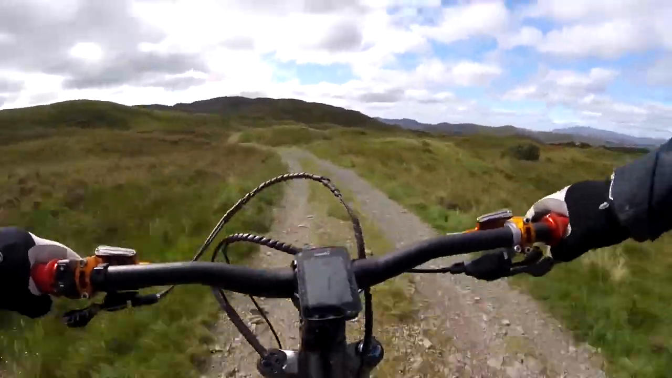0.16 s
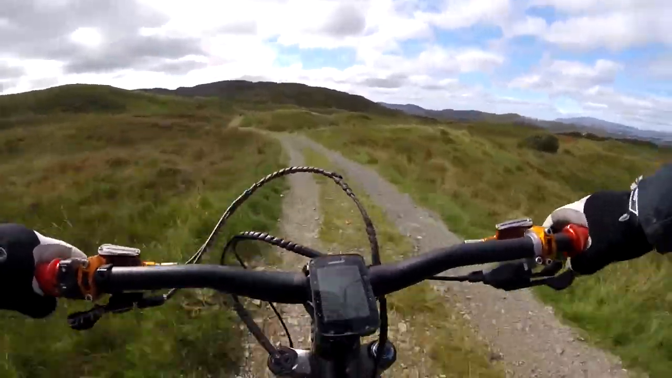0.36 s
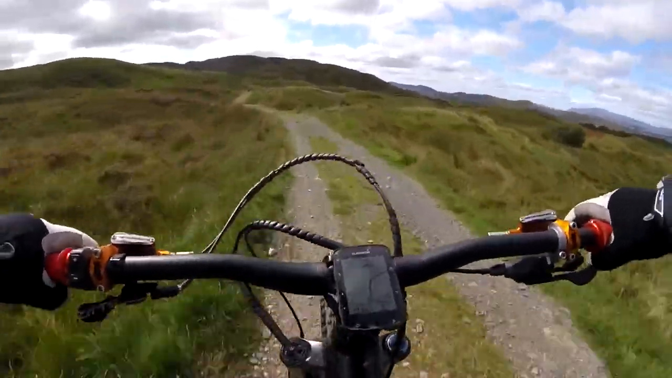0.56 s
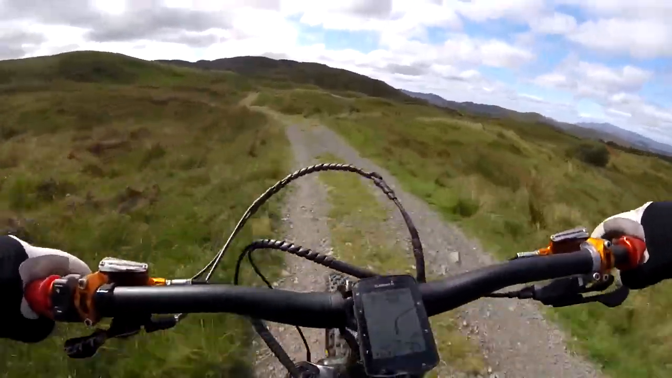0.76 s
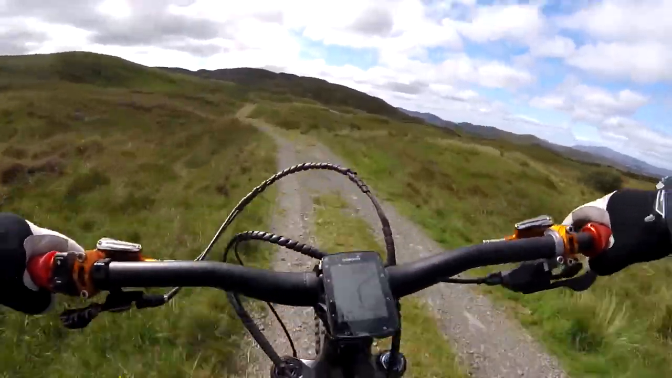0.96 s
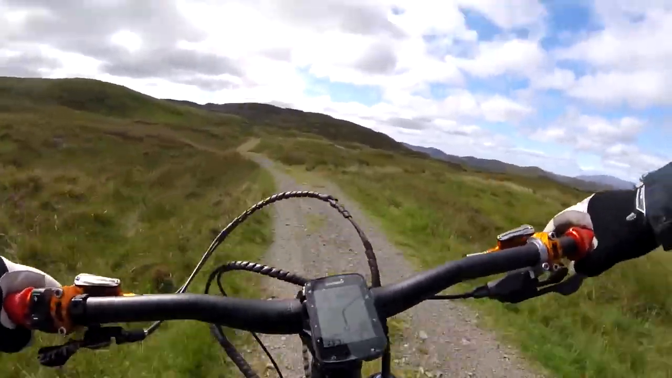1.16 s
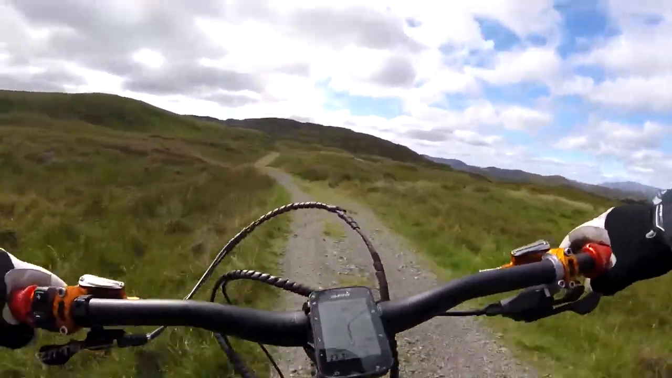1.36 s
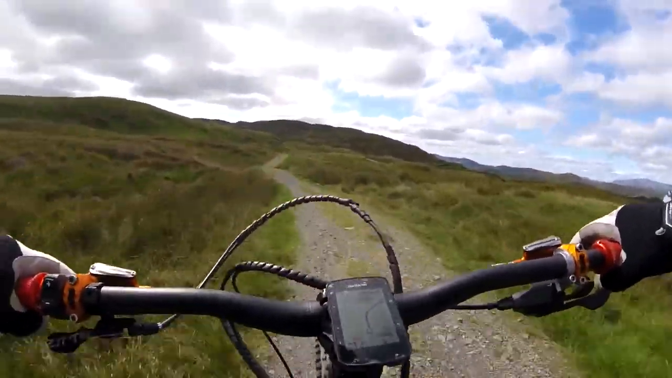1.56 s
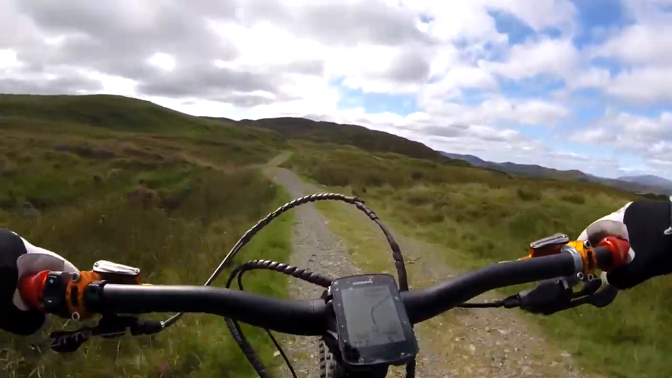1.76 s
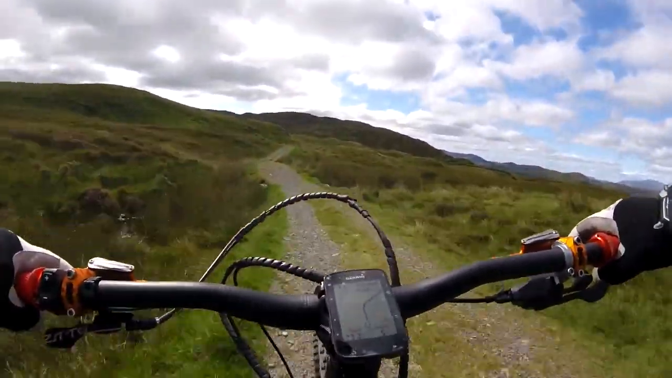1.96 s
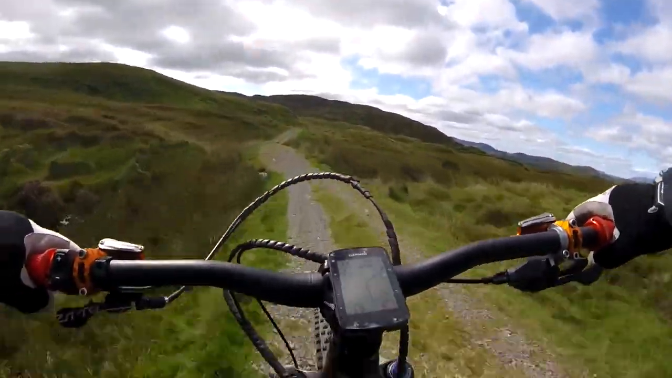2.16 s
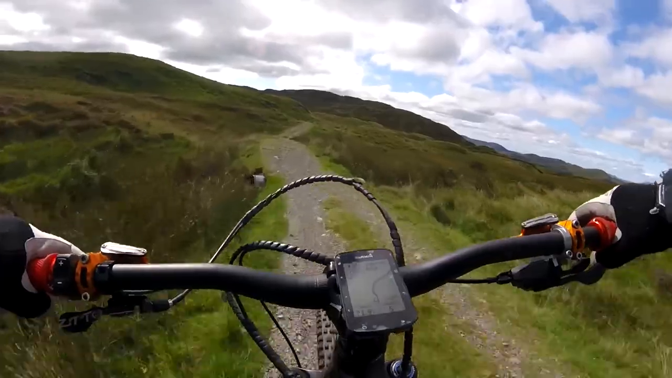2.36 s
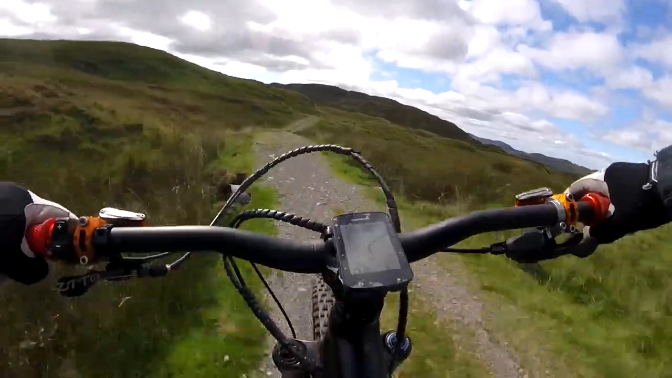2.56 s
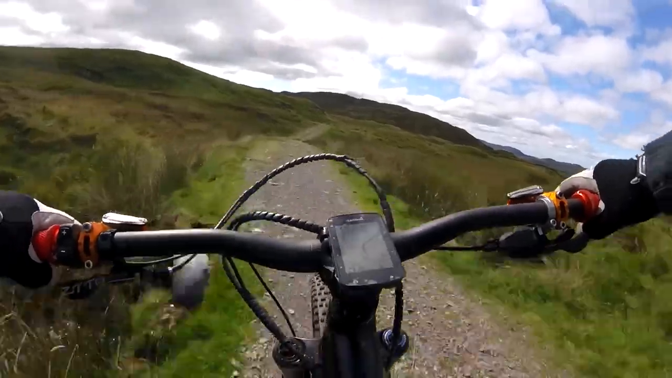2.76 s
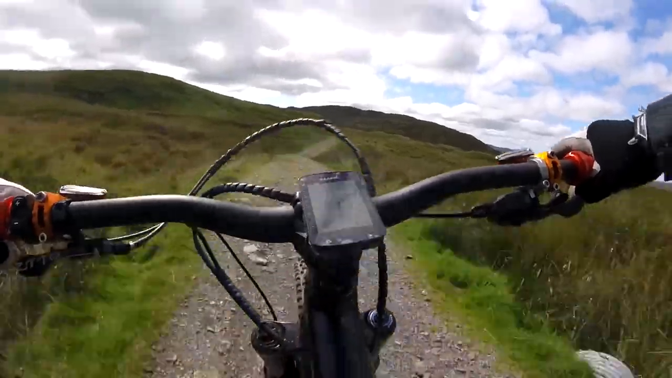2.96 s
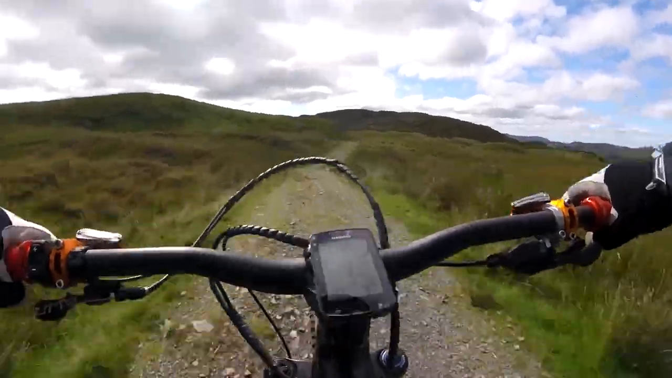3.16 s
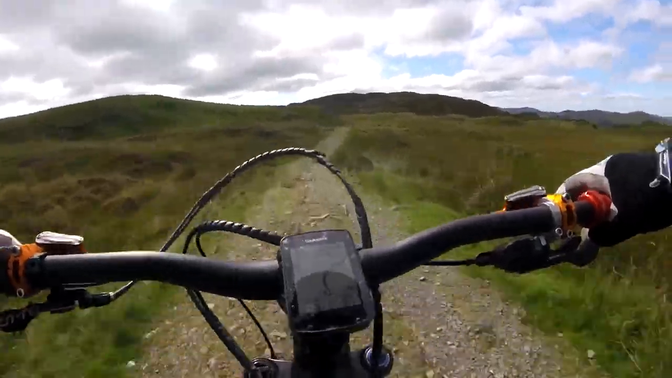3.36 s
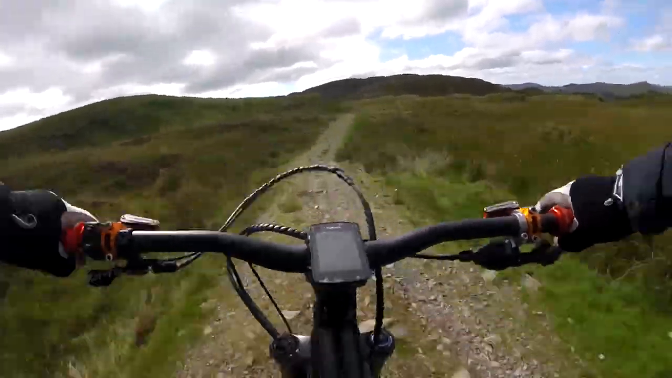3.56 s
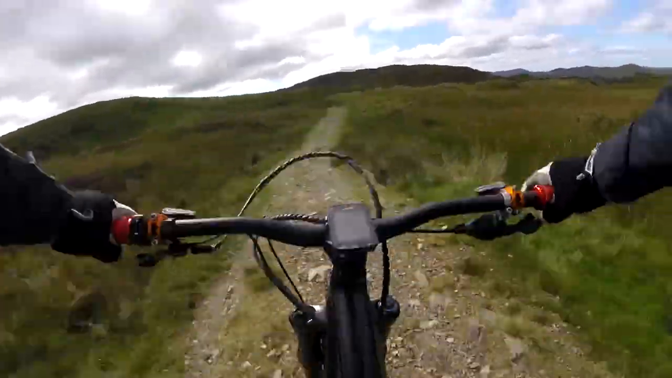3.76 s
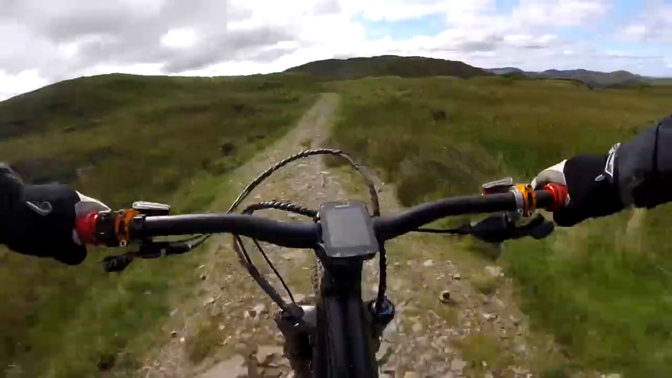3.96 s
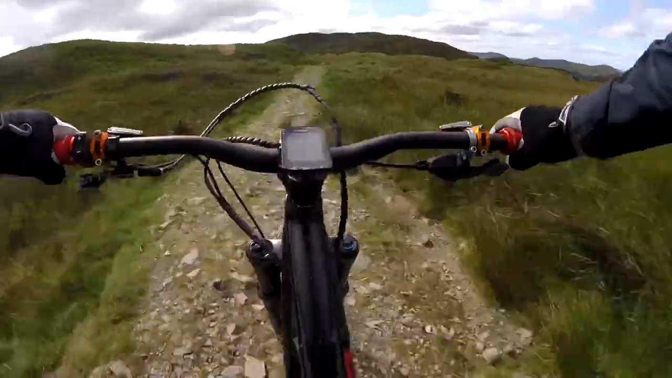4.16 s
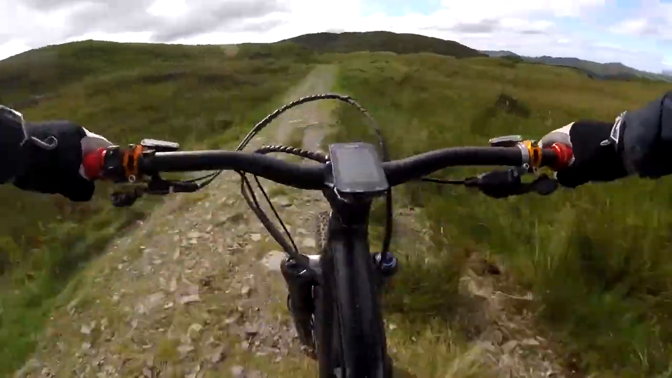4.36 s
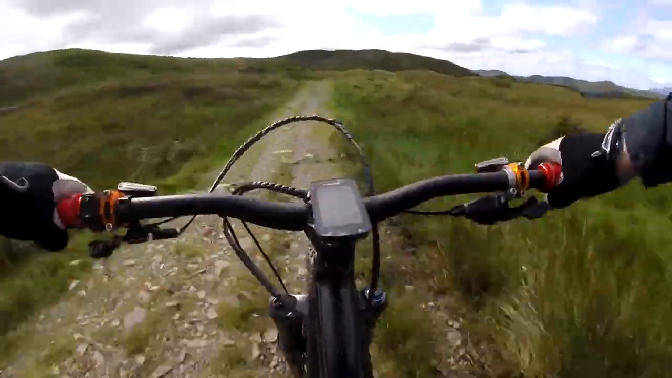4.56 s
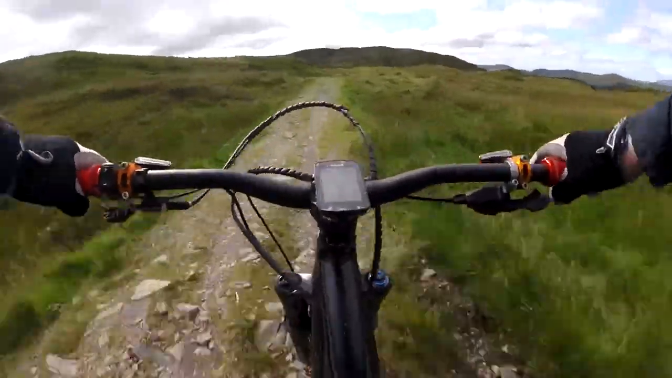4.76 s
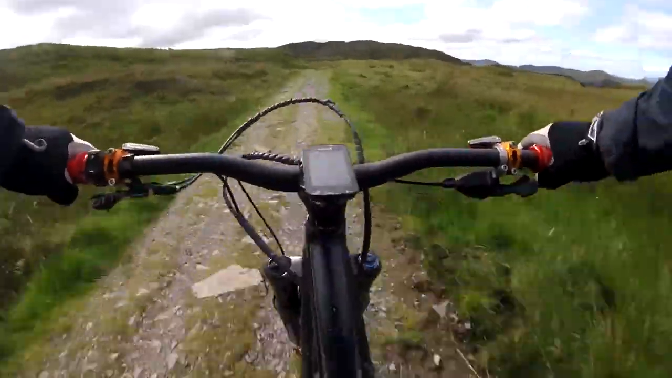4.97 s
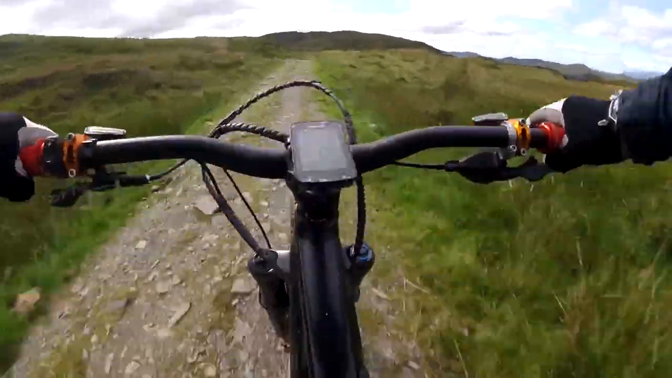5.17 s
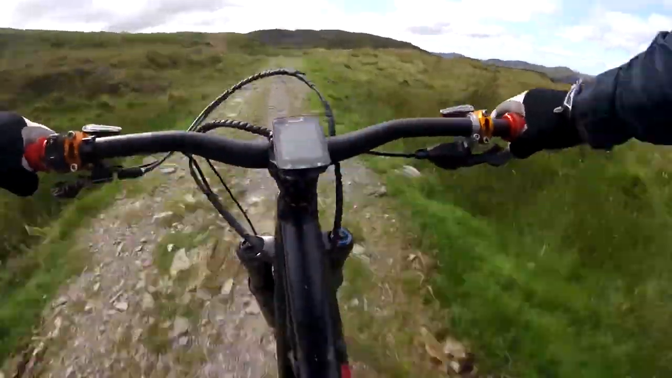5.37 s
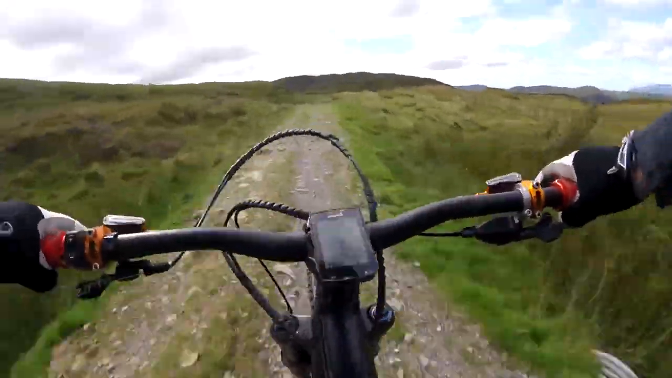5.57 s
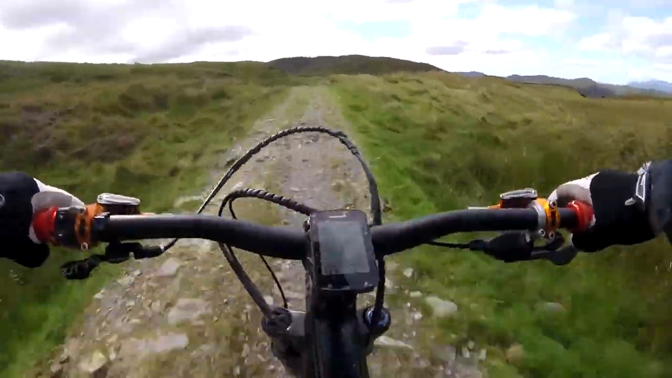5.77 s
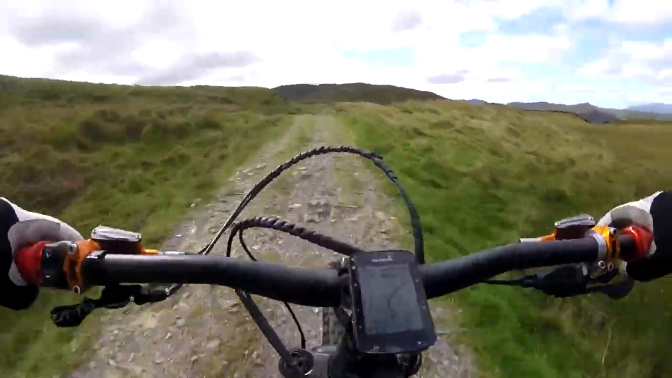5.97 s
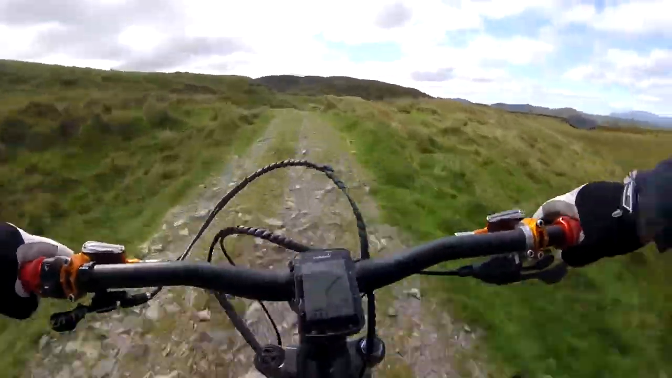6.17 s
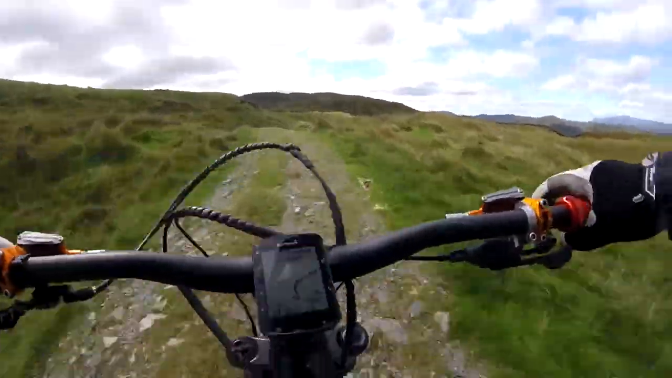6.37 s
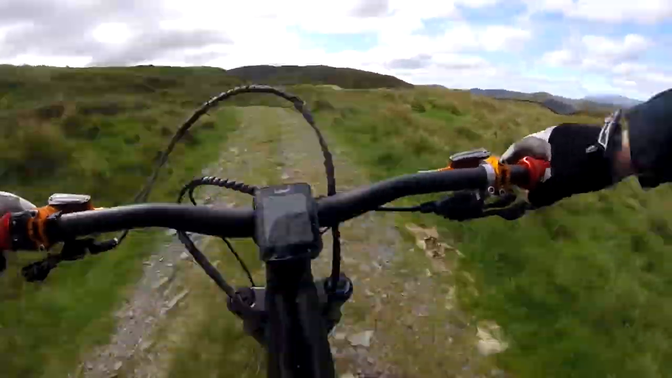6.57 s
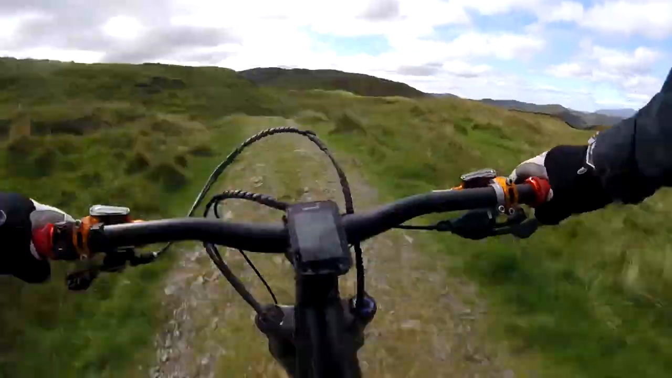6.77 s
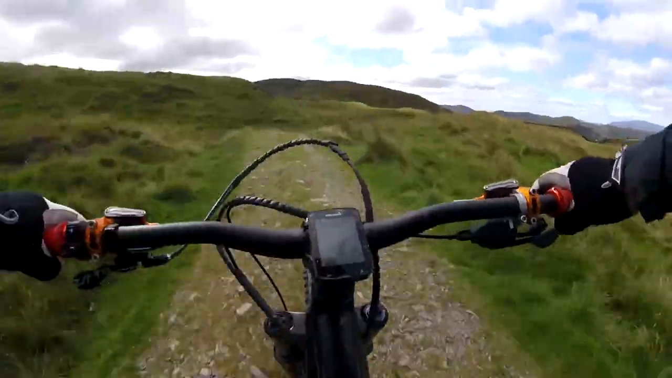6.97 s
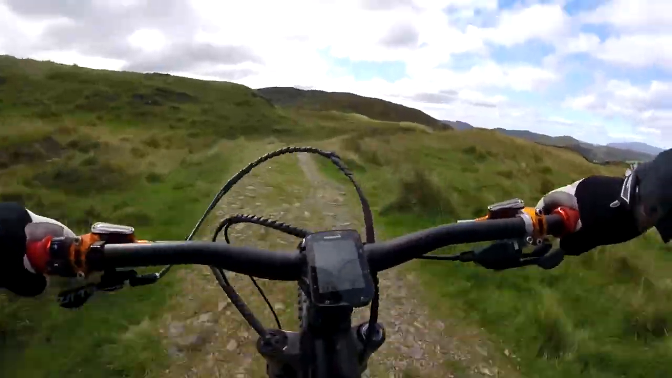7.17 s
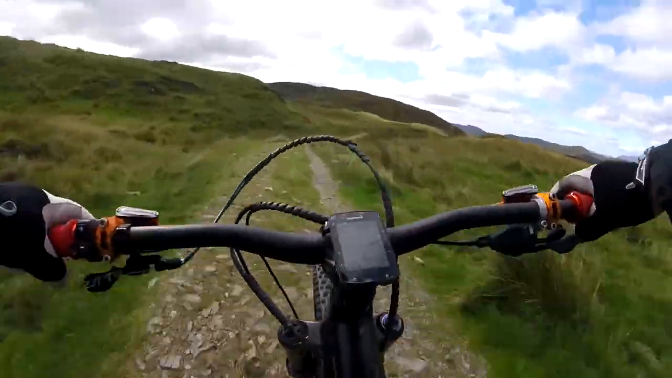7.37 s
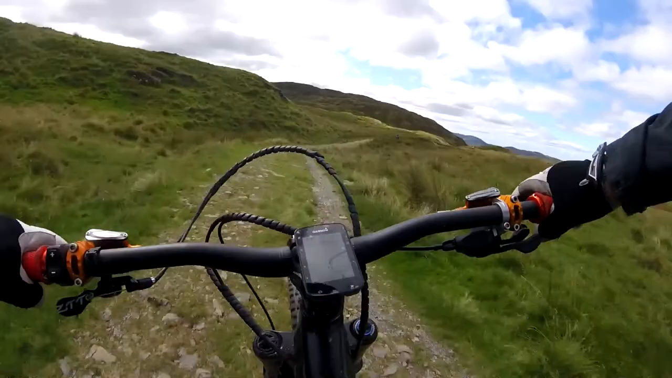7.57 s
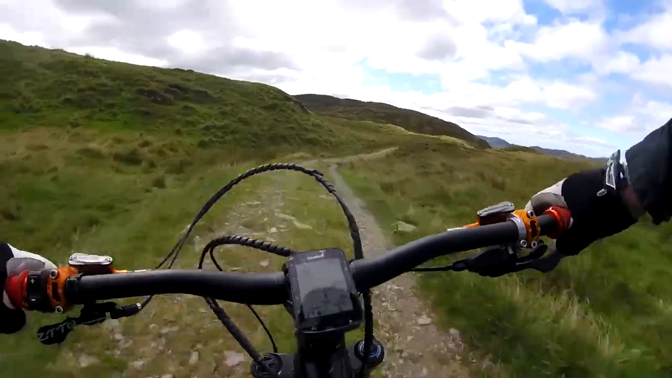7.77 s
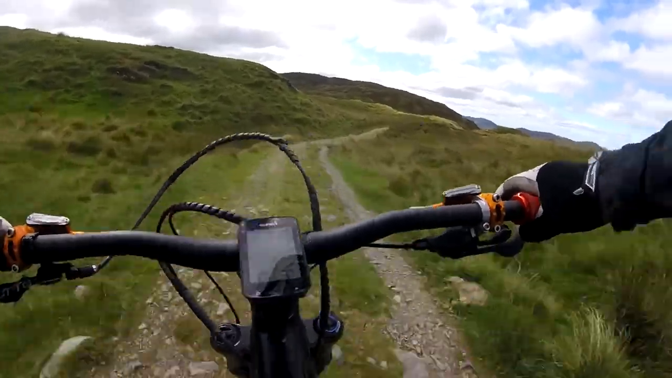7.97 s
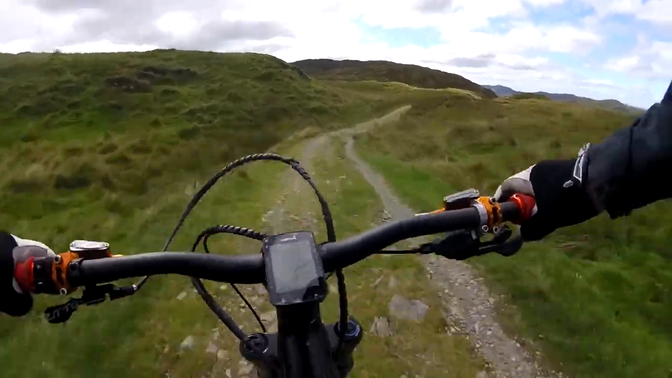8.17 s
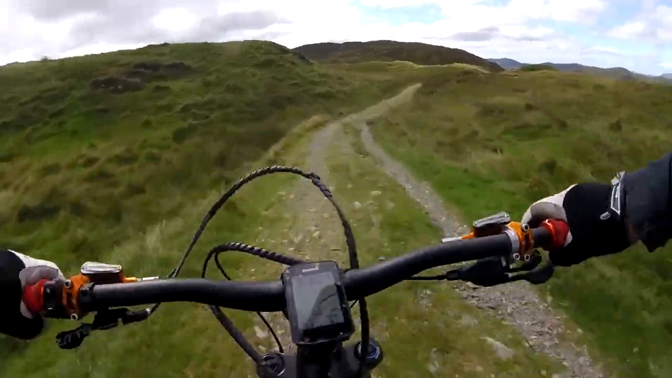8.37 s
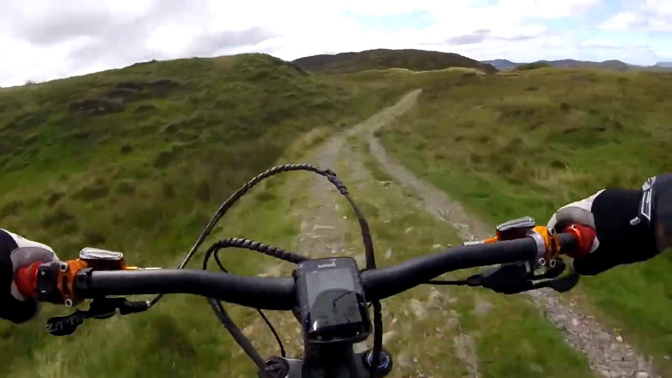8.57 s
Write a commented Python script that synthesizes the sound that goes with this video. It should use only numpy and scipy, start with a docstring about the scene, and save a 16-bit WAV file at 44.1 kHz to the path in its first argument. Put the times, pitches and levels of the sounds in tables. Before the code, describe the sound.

Tyres crunch steadily over gravel, dense and granular, with tiny bright ticks and pings as stones hit the bike. Gusts rumble and flutter on the microphone, with slaps and padded case knocks in two strong rough passages. Afterwards it calms to coarser crunching, scrapes and clacking pebbles. Dry open-air mono sound, very close, with no echo.

```python
"""On a loose stony track a mountain bike rolls fast downhill, heard from a camera on the rider's chest.
The tyres crunch gravel and spray grit: clustered random clicks through coloured filters and pitched rings.
Single stones clack, scrape or ping off the bike; bumps knock the camera case with a thud and a rattle.
Gusts buffet the microphone as filtered noise, with popping flutter and hard jolts.
Low decaying slaps and thumps come from wind and rough ground."""
import sys
import numpy as np
from scipy import signal
from scipy.fft import rfft, irfft
from scipy.io import wavfile
from scipy.ndimage import uniform_filter1d

SR = 44100
rng = np.random.default_rng(int(sys.argv[2]) if len(sys.argv) > 2 else 0)


def store_pcm(level_fs):
    """Save levels as 16-bit WAV."""
    pcm = np.round(np.clip(level_fs, -1, 1) * 32767).astype(np.int16)
    wavfile.write(sys.argv[1], SR, np.atleast_2d(pcm).T)


N = 380136
T = np.arange(N) / SR  # time in s
EVENT_SAMPLES = 4096  # room for one short sound, about 93 ms

# All colours are spectral outlines: pitch_hz [Hz], relative level_db [dB per Hz].
# Sharp snap of stone on stone: pitch_hz [Hz], level_db [dB per Hz]
SNAP_COLOUR = [(700, 0.5), (1500, -5), (1900, -3.5), (2200, -2), (2700, -8), (3300, -10.5), (3900, -13.5),
               (4400, -17.5), (4900, -13), (6000, -9), (10000, -29.5)]
# Bright tick of small hard stones: pitch_hz [Hz], level_db [dB per Hz]
PING_COLOUR = [(1000, -17), (3000, -4.5), (4200, -25), (5200, -9), (5700, 8), (6100, -6), (6600, 6.5),
               (7100, -8), (8000, -1.5), (9000, -6), (11000, -14.5), (14000, -75)]


def undb(db):
    """Decibels to gain."""
    return np.exp(np.asarray(db) * np.log(10) / 20)


def unit(x):
    """Scale to rms 1."""
    return x / np.sqrt(np.mean(x ** 2))


def curve(table):
    """A (time, level) table joined by straight lines in time."""
    start_s, level_db = np.transpose(table)
    return np.interp(T, start_s, level_db)


def colour(x, points, size=8192):
    """Causal minimum-phase filter with the given (Hz, dB) outline: its peaks ring after each click."""
    hz, db = np.transpose(points)
    bins_hz = np.maximum(np.arange(size // 2 + 1) * SR / size, 1)
    outline_db = np.interp(np.log(bins_hz), np.log(hz), db)
    # folding the cepstrum forward in time makes the filter causal
    cepstrum = irfft(np.log(undb(outline_db)))
    cepstrum[1:size // 2] *= 2
    cepstrum[size // 2 + 1:] = 0
    response = irfft(np.exp(rfft(cepstrum)))
    return signal.fftconvolve(x, response)[:len(x)]


def walk(rate_hz):
    """Random levels, rate_hz new ones a second, joined by straight glides; rms 1."""
    hold = max(int(SR / rate_hz), 2)
    steps = rng.standard_normal(N // hold + 1)
    return unit(uniform_filter1d(np.repeat(steps, hold), hold)[:N])


def grains(rate_hz, spread_db):
    """Contacts at random moments, rate_hz a second on average, most small and a few large."""
    happens = rng.random(N) < rate_hz / SR
    size, sign = rng.standard_normal((2, happens.sum()))
    out = np.zeros(N)
    out[happens] = undb(spread_db * np.minimum(size, 2)) * np.sign(sign)
    return out


def add(out, start_s, sound, level_db):
    """Mix in a sound whose loudest 4 ms have the given rms level."""
    i = max(int(start_s * SR), 0)
    peak = np.sqrt(uniform_filter1d(sound ** 2, 176).max())
    out[i:i + len(sound)] += (sound * undb(level_db) / peak)[:N - i]


def burst(decay_s):
    """A contact: noise that dies away at once."""
    return rng.standard_normal(EVENT_SAMPLES) * np.exp(-T[:EVENT_SAMPLES] / decay_s)


def ring(x, hz, width_hz):
    """One resonance, gain 1 at its centre."""
    b, a = signal.iirpeak(hz, max(hz / width_hz, .5), fs=SR)
    return signal.lfilter(b, a, x)


def airflow():
    """Buffeting level in dB before trims: the powers of the uneven riding breeze and of the gusts add up."""
    # steady air stream of riding: start_s [s], level_db [dB before trims]
    breeze = [(0.0, -27), (0.7, -33), (1.4, -30.5), (2.1, -29.5), (3.2, -33), (3.8, -28), (4.6, -23),
              (5.55, -29), (6.0, -32.5), (7.15, -32.5), (8.0, -30), (8.62, -31.5)]
    # gusts on the microphone: full_s [s, when the swell is complete], hold_s [s], level_db [dB before trims]
    gusts = [(0.454, .07, -31), (0.802, 0.028, -26.5), (1.613, 0.13, -30), (2.187, 0.83, -25),
             (2.367, 0.048, -21), (2.558, 0.24, -16.5), (3.918, 0.091, -21), (4.078, 0.12, -13.5),
             (4.366, 0.23, -16.5), (4.635, 0.15, -21), (4.894, 0.55, -21), (5.079, 0.12, -14.5),
             (5.336, 0.16, -17), (5.94, 0.75, -31), (6.543, 0.1, -26.5), (6.76, 0.065, -26.5),
             (7.38, 0.083, -37), (7.993, 0.071, -28.5), (8.38, 0.14, -29)]
    attack_s, release_s = 0.036, 0.027
    wobble_db = 2  # rms
    power = undb(curve(breeze) + wobble_db * walk(12)) ** 2
    for full_s, hold_s, level_db in gusts:
        swell = np.clip(1 + (T - full_s) / attack_s, 0, 1)
        fade = np.exp(-np.maximum(T - full_s - hold_s, 0) / release_s)
        power = power + (undb(level_db) * swell * fade) ** 2
    return 10 * np.log10(power)


def wind():
    """Large eddies rumble, small ones pop and strong gusts jolt; low slaps and thumps decay on top."""
    # rumble of large eddies: pitch_hz [Hz], level_db [dB per Hz]
    rumble_colour = [(12, -10), (25, -0.5), (50, -0.5), (80, -1), (125, -6), (165, -8), (230, -10.5),
                     (320, -17.5), (450, -27.5), (650, -34), (1200, -51.5), (3000, -73), (12000, -87)]
    # pops of small eddies: pitch_hz [Hz], level_db [dB per Hz]
    flutter_colour = [(70, -15), (125, 10.5), (165, -4), (205, 9.5), (260, 1), (350, 2.5), (500, -8.5),
                      (680, -16.5), (900, -11.5), (1500, -21.5), (3000, -32.5), (12000, -66)]
    # sharp edge of an eddy bursting on the case: pitch_hz [Hz], level_db [dB per Hz]
    jolt_colour = [(100, -13), (250, -4.5), (420, 1), (700, -4), (1000, -10.5), (1500, -22), (3000, -52),
                   (12000, -74)]
    # low decaying slaps and thumps, of wind and of rough ground:
    # start_s [s], level_db [dB before trim], pitch_hz [Hz]
    slaps = [(0.853, -18, 50.3), (2.381, -6, 37.3), (2.651, -9, 129), (2.701, -2.5, 72.5), (2.79, -10, 82),
             (2.99, -1, 113), (3.918, -15, 197), (4.085, -7, 230), (4.151, -8, 132), (4.193, -6, 116),
             (4.465, -10, 135), (4.565, 0.5, 86), (5.084, -3, 56), (5.35, -2.5, 107), (5.405, -7, 76),
             (5.479, -8, 126), (6.172, -15, 117), (6.348, -17, 214), (6.755, -16, 90), (6.773, -15.5, 192),
             (7.384, -15, 44.7), (7.469, -17.5, 54.6), (7.852, -16.5, 44), (7.998, -14, 122),
             (8.024, -12, 137), (8.357, -17, 66.7), (8.404, -20, 170)]
    slap_trim_db = -3.0

    flow_db = airflow()
    eddies = unit(colour(rng.standard_normal(N) * undb(2.15 * walk(70)), rumble_colour))
    # the flow sets the strength of the eddies over any few of them (68 ms)
    eddies = eddies / np.sqrt(uniform_filter1d(eddies ** 2, size=3000))
    flutter = unit(colour(grains(800, 4.8) * np.abs(eddies) ** 1.08, flutter_colour))
    jolts = unit(colour(grains(1800, 1.3) * np.maximum(eddies, 0), jolt_colour))

    out = eddies * undb(flow_db + 0.5)
    out += flutter * undb(0.97 * (flow_db + 19.0) - 28.5)
    # jolts grow faster than the flow
    out += jolts * undb(1.33 * (flow_db + 14) - 33.0)
    t = T[:EVENT_SAMPLES]
    for start_s, level_db, hz in slaps:
        # each slap decays within about one cycle
        slap = np.sin(2 * np.pi * hz * t) * np.exp(-t * hz / 0.9)
        add(out, start_s, slap * rng.choice([-1, 1]), level_db + slap_trim_db)
    return out


def knocks():
    """A bump jolts the camera case: a padded tap and a damped thud together, with a brief mount rattle."""
    # bumps: start_s [s], tap_db [dB before trim], thud_db [dB before trim], pitch_hz [Hz], rattle_s [decay, s]
    bumps = [(0.314, -29, -23.5, 596, .003), (0.3171, -17.5, -25.5, 1380, 0.0074),
             (0.657, -33, -19.5, 650, 0.0018), (1.028, -40, -27, 600, .003),
             (1.796, -23.5, -27, 900, 0.0025), (1.807, -20.5, -18.5, 1240, 0.0025),
             (2.033, -36, -21.5, 600, .003), (2.197, -24, -22, 850, 0.0033), (2.405, -22, -24, 880, 0.0045),
             (2.552, -32, -15, 600, .003), (2.5651, -16.5, -14, 1150, 0.0026),
             (2.5933, -16, -14, 694, .004), (2.716, -24, -15, 620, .004), (2.972, -26, -37, 800, .003),
             (2.9877, -14.5, -18, 1160, 0.0017), (2.997, -21, -28, 740, 0.004),
             (3.016, -28, -28, 800, .003), (3.3113, -15.5, -22, 940, 0.0022),
             (3.548, -30, -26.5, 700, 0.0047), (3.9418, -13, -24, 1400, 0.0017),
             (4.067, -21, -18, 950, 0.0043), (4.094, -21, -13, 1300, .003),
             (4.132, -22, -15.5, 600, 0.0035), (4.184, -32, -16.5, 620, .003),
             (4.244, -30, -19, 1200, .003), (4.3501, -13, -12, 780, 0.0038), (4.4729, -25, -16, 950, .003),
             (4.552, -25.5, -23, 700, 0.0035), (4.591, -22, -16, 1150, .004),
             (4.698, -31, -17.5, 620, .003), (4.942, -31, -16.5, 620, .003), (5.017, -30, -15.5, 650, .003),
             (5.125, -23, -16, 650, 0.0028), (5.186, -24, -12, 700, 0.0048),
             (5.236, -21.5, -33, 1490, .004), (5.407, -28, -12.5, 650, .003),
             (5.778, -26, -42, 960, 0.0036), (6.0, -27, -39, 790, .004), (6.608, -43, -20.5, 600, .003),
             (6.754, -44, -23.5, 890, .003), (7.089, -24.5, -47, 1130, 0.0037),
             (7.884, -28, -35, 620, 0.0061), (8.026, -50, -26, 560, 0.0017), (8.047, -47, -27, 600, .003)]
    # hollow case: pitch_hz [Hz], level_db [dB per Hz]
    case_colour = [(100, -2), (400, 7), (620, -0.5), (850, 1.5), (1100, -2.5), (1320, -6), (1520, 1),
                   (1750, -11), (2100, -17), (3300, -24), (5000, -33), (9000, -50)]
    trim_db = -0.5
    out = np.zeros(N)
    t = T[:EVENT_SAMPLES]
    push = t * np.exp(-t / .0001)
    for start_s, tap_db, thud_db, hz, rattle_s in bumps:
        rattle = unit(colour(burst(rattle_s), case_colour))
        tap = unit(colour(push, case_colour)) + rattle
        thud = ring(ring(push, 225, 224), 214, 260)
        add(out, start_s, tap + 1.35 * ring(tap, hz, 330), tap_db + trim_db)
        add(out, start_s, thud, thud_db + trim_db)
    return out


def pings():
    """A flicked stone cracks against the bike, chatters for an instant and leaves a short bright ring."""
    # flicked stones: start_s [s], ring_db [dB before trim], pitch_hz [Hz], crack_db [dB before trim]
    flicks = [(0.0123, -24.5, 6270, -30), (0.079, -30, 6300, -39), (0.109, -29, 6740, -36),
              (0.1568, -27, 7240, -38), (0.44, -18.5, 5470, -3.5), (0.4424, -11.5, 6000, -18),
              (0.476, -25, 6530, -22), (0.541, -27, 6400, -31), (0.916, -32, 6500, -40),
              (0.97, -32, 6700, -40), (1.026, -29, 6800, -42), (1.2725, -22.5, 7250, -32),
              (1.757, -26, 6700, -39), (1.84, -29, 6900, -37), (1.9564, -23, 6440, -28),
              (1.9587, -18, 5800, -30), (2.032, -33, 5800, -42), (2.38, -28, 6700, -35),
              (2.4395, -20, 6500, -35), (2.464, -28, 6430, -41), (3.684, -26, 6400, -31),
              (3.785, -33, 6500, -40), (3.911, -30, 6350, -36), (3.9513, -25, 6700, -41),
              (4.138, -30, 6220, -36), (4.316, -27, 6500, -38), (4.828, -31, 6600, -35),
              (5.9805, -24.5, 5500, -28), (6.067, -31, 6500, -37), (6.2846, -29.5, 6260, -38),
              (6.6214, -29, 6800, -37), (6.65, -31, 6440, -38), (6.704, -32.5, 6600, -39),
              (6.788, -36, 6200, -27), (7.0232, -30, 6240, -31), (7.416, -33, 6450, -40),
              (7.816, -29, 7200, -35), (7.9317, -35, 7300, -30)]
    # dry crack of a hard stone: pitch_hz [Hz], level_db [dB per Hz]
    crack_colour = [(300, 12.5), (1000, -5), (2200, -18), (2900, -19), (3500, -7), (4900, 4), (6300, 11),
                    (7800, -2.5), (9000, -33), (14000, -32)]
    ring_trim_db, crack_trim_db = -2.5, -7.5
    chatter_share = .85
    out = np.zeros(N)
    strike = unit(signal.unit_impulse(EVENT_SAMPLES))
    for start_s, ring_db, hz, crack_db in flicks:
        contact = colour(strike + chatter_share * unit(burst(0.0056)), PING_COLOUR)
        crack = colour(strike + chatter_share * unit(burst(0.0028)), crack_colour)
        add(out, start_s, contact + 5.2 * ring(contact, hz, 550), ring_db + ring_trim_db)
        add(out, start_s, crack, crack_db + crack_trim_db)
    return out


def scrapes():
    """A stone shoved across its neighbours catches and slips in a run of grains that swells and trails off."""
    # shoved stones: height_s [s, height of the scrape], level_db [dB before trim], pitch_hz [Hz], fade_s [s]
    shoves = [(0.33, -23.5, 1260, 0.024), (2.53, -27, 1100, .02), (4.098, -25, 1550, .012),
              (6.365, -31, 1250, 0.023), (6.61, -35, 1400, .02), (7.13, -32, 1400, 0.0086),
              (7.742, -24, 1160, 0.026)]
    rise_s, trim_db = 0.0096, -9.5
    out = np.zeros(N)
    for height_s, level_db, hz, fade_s in shoves:
        distance = np.maximum((height_s - T) / rise_s, (T - height_s) / fade_s)
        catches = grains(1800, 2.1) * np.exp(-np.minimum(distance, 20))
        body = ring(ring(catches, hz, 520), hz, 780)
        add(out, 0, colour(catches, SNAP_COLOUR) + 5.0 * body, level_db + trim_db)
    return out


def clacks():
    """Larger stones shift under the tyre and strike each other, each at its pitch, some dead, some ringing."""
    # larger stones: start_s [s], level_db [dB before trim], pitch_hz [Hz], width_hz [Hz, width of the ring],
    # snap_db [dB, dry snap against the ring before trim]
    strikes = [(0.012, -15.5, 2380, 700, 2), (0.233, -26, 1700, 600, -6), (0.754, -24.5, 1390, 400, -10),
               (1.532, -31, 1490, 500, -14), (1.92, -22, 1400, 500, -7), (2.233, -27, 1450, 500, -16),
               (2.282, -21, 1300, 500, -8), (2.83, -25.5, 1550, 600, -21), (3.428, -28, 1100, 400, -12),
               (3.6702, -20.5, 1540, 600, -3), (3.683, -24, 1600, 700, -8), (3.963, -23, 1550, 500, -12),
               (4.6884, -19.5, 3080, 900, 4), (5.1583, -18, 996, 600, 5), (5.651, -29, 1470, 400, -15),
               (5.872, -31, 1420, 400, -5), (5.916, -26, 1500, 500, -9), (6.059, -22.5, 790, 300, -5),
               (6.097, -30, 1600, 400, -6), (6.226, -23, 1390, 500, -10), (6.293, -23, 750, 300, -6),
               (6.332, -25.5, 1600, 500, -8), (6.3667, -20.5, 1450, 500, -7), (6.455, -21, 1700, 600, -3),
               (6.556, -23, 1510, 400, -13), (6.6037, -21, 1220, 500, -3), (6.62, -17, 1470, 600, -8),
               (6.818, -27, 1650, 500, -5), (6.863, -32, 1500, 400, -7), (6.927, -19, 1650, 700, -6),
               (7.029, -29, 895, 400, -4), (7.055, -28, 2100, 250, -5), (7.323, -29, 2160, 200, -14),
               (7.436, -25, 930, 500, 6), (7.5865, -24, 1530, 500, -4), (7.623, -29, 1100, 400, -10),
               (7.741, -23, 1150, 400, 4), (7.756, -29, 1250, 500, 2), (7.816, -28, 2000, 600, 9),
               (7.915, -24, 1120, 400, 2), (8.113, -34, 2250, 200, -14), (8.302, -27.5, 2050, 300, -1),
               (8.462, -25, 950, 400, -20), (8.497, -26, 1180, 500, -7)]
    trim_db, snap_trim_db = -9.0, 2.5
    out = np.zeros(N)
    for start_s, level_db, hz, width_hz, snap_db in strikes:
        contact = burst(0.0046)
        body = unit(ring(ring(contact, hz, width_hz), hz, 2 * width_hz))
        snap = unit(colour(contact, SNAP_COLOUR)) * undb(snap_db + snap_trim_db)
        add(out, start_s, snap + body, level_db + trim_db)
    return out


def pebble_bed(rate_hz, spread_db, low_hz, high_hz, sharpness, count):
    """Stones of count sizes, each size struck rate_hz times a second and ringing briefly at its own pitch."""
    pitches_hz = np.geomspace(low_hz, high_hz, count)
    return sum(ring(grains(rate_hz, spread_db), hz, hz / sharpness) for hz in pitches_hz)


def ground():
    """Crunch, snap and grit in dB before trims: all follow the work on the stones, crunch also the gravel."""
    # how hard the tyres work the stones: start_s [s], level_db [dB, stone on stone before trims]
    stone_work = [(0.0, -44), (0.35, -48), (0.58, -50.5), (1.05, -47.5), (2.25, -47.5), (2.5, -43),
                  (2.75, -48.5), (3.5, -50), (3.7, -51), (4.1, -45.5), (4.55, -46.5), (5.15, -45.5),
                  (5.5, -54.5), (6.05, -49.5), (6.65, -50.5), (7.2, -51.5), (7.55, -50), (8.15, -52.5),
                  (8.62, -51)]
    # depth of loose gravel: start_s [s], level_db [dB, crunch above the stones before trims]
    gravel_depth = [(0.0, 8.5), (1.0, 12.5), (2.05, 14), (3.1, 11.5), (3.42, 12.5), (4.1, 6.5), (4.75, 9.5),
                    (5.3, 8.5), (5.7, 11), (7.0, 10), (8.1, 2.5), (8.62, 11.5)]
    # grit level on ordinary ground [dB], work on ordinary ground [dB], grit gained per work [dB per dB]
    grit_db, ordinary_db, grit_slope = -49, -49, 0.72
    stones_db = curve(stone_work)
    crunch_db = stones_db + curve(gravel_depth)
    return crunch_db, stones_db, grit_db + grit_slope * (stones_db - ordinary_db)


def tyres():
    """Stones grind and snap in clusters as the knobs press on them, and fine grit sprays off."""
    # low grinding of stones: pitch_hz [Hz], level_db [dB per Hz]
    crunch_colour = [(100, -12), (230, 11.5), (400, 5.5), (520, 2.5), (640, -6.5), (830, 2.5), (1000, -2.5),
                     (1150, 1), (1320, -5.5), (1520, 0), (1850, -7), (2600, -35), (5000, -42)]
    # hiss of fine grit: pitch_hz [Hz], level_db [dB per Hz]
    grit_colour = [(2500, -39), (4400, -18.5), (5050, -6.5), (5350, -6.5), (5680, -2), (6100, -2.5),
                   (6520, 8), (6850, 1.5), (7400, -3.5), (8200, -9), (9200, -13.5), (10200, -18),
                   (11500, -56), (14000, -29)]
    # brief changes in tyre level, mostly swells of crunch and hiss:
    # peak_s [s], change_db [dB], reach_s [s, from the peak to either end]
    swells = [(0.348, 2, 0.067), (0.541, 5.5, 0.024), (2.22, 0.5, 0.038), (2.405, -1.5, 0.028),
              (3.433, 9.5, 0.015), (3.802, 8.5, 0.037), (3.941, 7, 0.052), (4.117, 4, 0.066),
              (4.226, 4.5, 0.066), (5.239, 6.5, 0.055), (6.34, 2.5, 0.07), (6.45, 7.5, 0.06),
              (6.63, 3.5, 0.071), (6.79, 7, 0.012), (7.413, 2, 0.024), (7.748, 6.5, 0.035),
              (8.319, 7, 0.032), (8.505, 4, 0.032)]

    crunch_db, snap_db, grit_db = ground()
    swell_db = sum(change_db * np.maximum(1 - np.abs(T - peak_s) / reach_s, 0)
                   for peak_s, change_db, reach_s in swells)
    # a shared uneven load presses most of the stones; small snaps cluster on their own
    load = unit(walk(65) + 0.73 * walk(22))
    # the later stretch is coarser: the contacts stand further apart in level
    coarse_db = np.interp(T, [3.0, 6.5], [1.3, 2.3])
    press = undb(coarse_db * load)

    stones = grains(800, 5.6) * press
    crunch = unit(colour(stones + 0.61 * grains(3000, 1.3) * press, crunch_colour))
    small_snaps = grains(3000, 3.6) * undb(coarse_db * walk(90))
    snap = unit(colour(0.75 * stones + small_snaps, SNAP_COLOUR))
    spray_db = load + 2 * walk(300) + 1.1 * walk(16)
    grit = unit(colour(grains(7000, 3.5) * undb(spray_db), grit_colour))

    # cobbles clunk, pebbles clack, sharp chips tick
    cobble_bed = pebble_bed(25, 4.3, 455, 1680, 11.3, count=11)
    clack_bed = pebble_bed(40, 1.7, 1409, 3640, 26.6, count=9)
    chip_bed = pebble_bed(13, 5.1, 6250, 10140, 18.0, count=6)
    cobbles = unit(colour(cobble_bed * press, crunch_colour))
    pebbles = unit(colour(clack_bed * press, SNAP_COLOUR))
    chips = unit(colour(chip_bed * undb(3.1 * load), PING_COLOUR))

    low = (crunch + 0.63 * cobbles) * undb(crunch_db - 1.5)
    low += (snap * undb(3.5) + pebbles * undb(-1.0)) * undb(snap_db)
    high = (grit * undb(4.0) + chips * undb(-8.0)) * undb(grit_db)
    # grit and chips change slightly more than the stones
    return low * undb(swell_db) + high * undb(1.03 * swell_db)


def scene():
    """Wind, slaps and thumps, knocks, single stones and rolling tyres, in mono."""
    return (wind() + knocks() + pings() + scrapes() + clacks() + tyres())[None]


def record(dry):
    """Rounds the loudest peaks; low-pass at 11450 Hz."""
    rounded = np.tanh(0.88 * dry) / 0.94
    low_pass = signal.ellip(8, .2, 70, 11450, fs=SR, output="sos")
    return signal.sosfilt(low_pass, rounded)


dry = scene()
out = record(dry)
store_pcm(out)
```